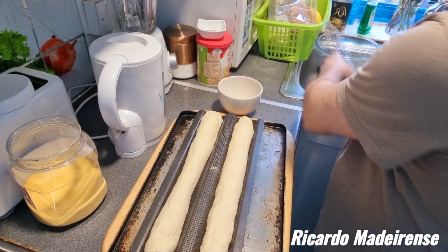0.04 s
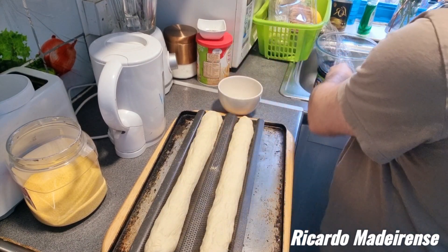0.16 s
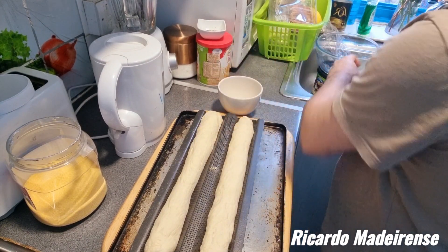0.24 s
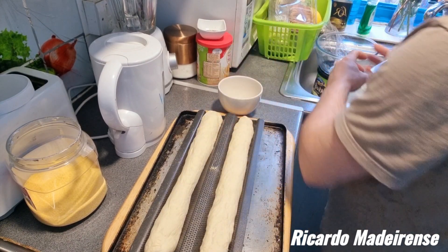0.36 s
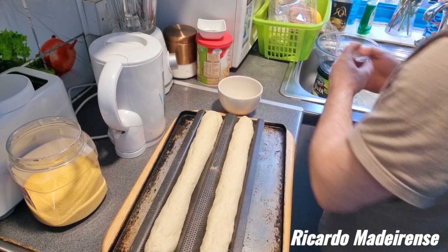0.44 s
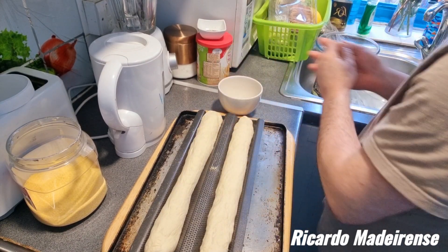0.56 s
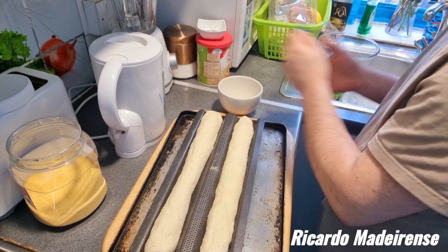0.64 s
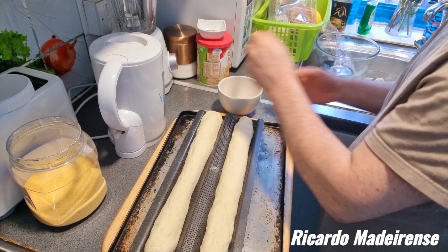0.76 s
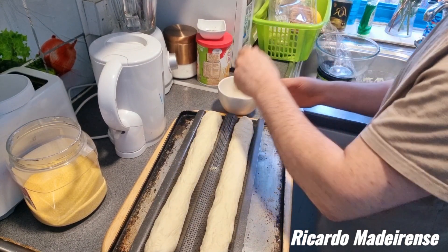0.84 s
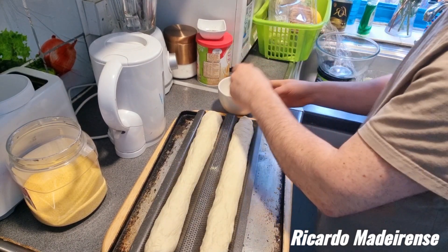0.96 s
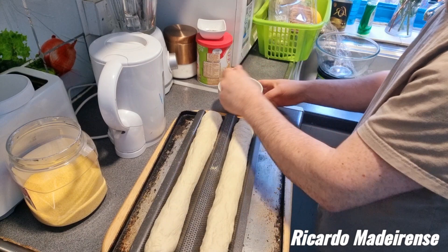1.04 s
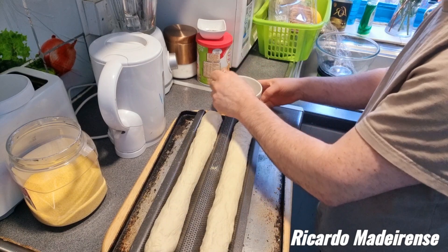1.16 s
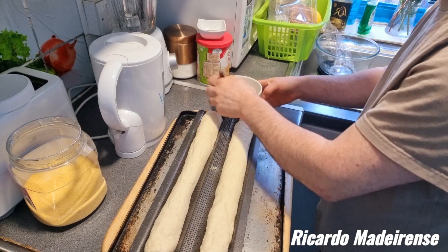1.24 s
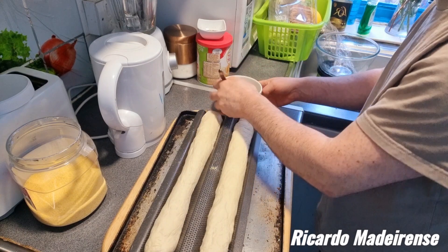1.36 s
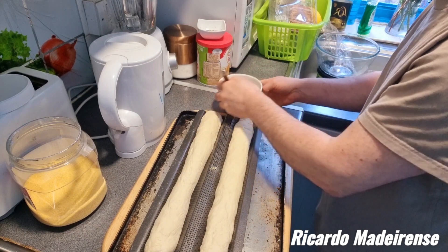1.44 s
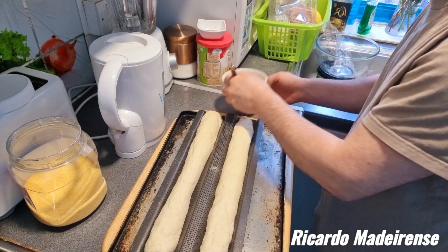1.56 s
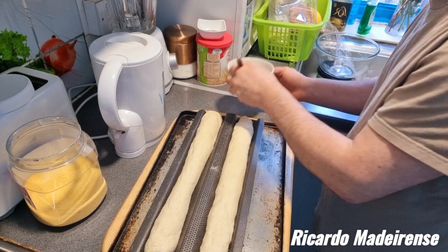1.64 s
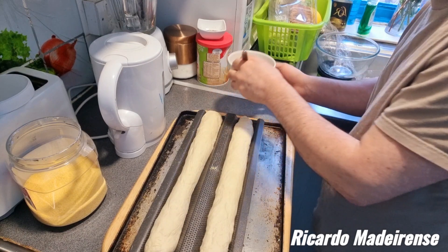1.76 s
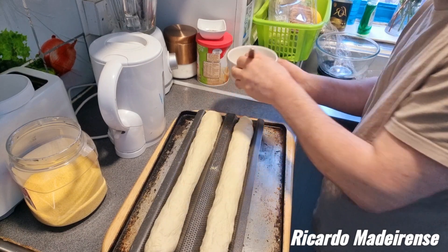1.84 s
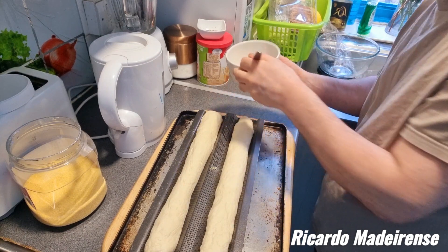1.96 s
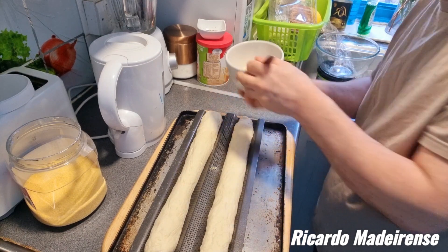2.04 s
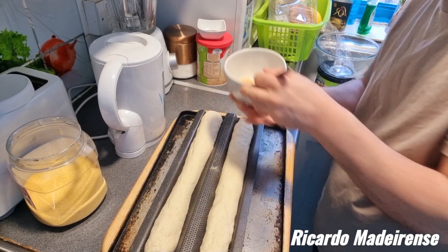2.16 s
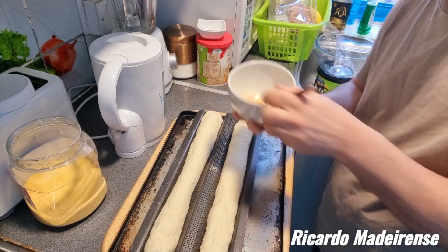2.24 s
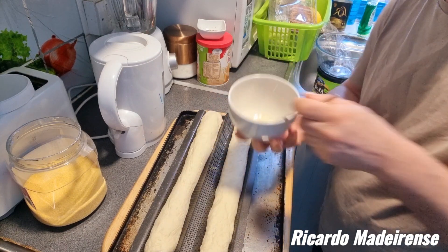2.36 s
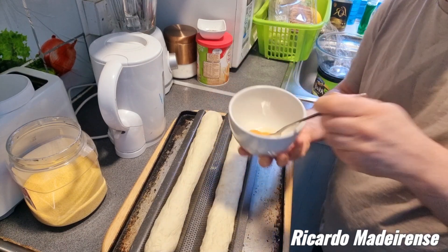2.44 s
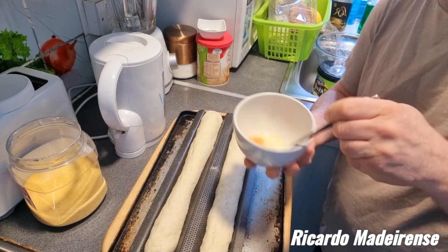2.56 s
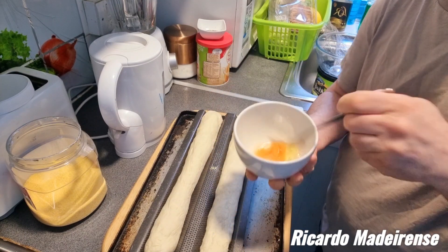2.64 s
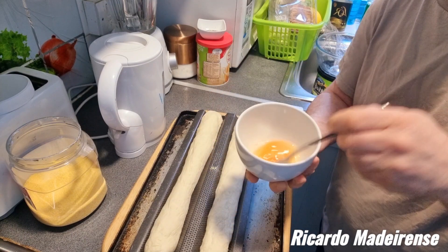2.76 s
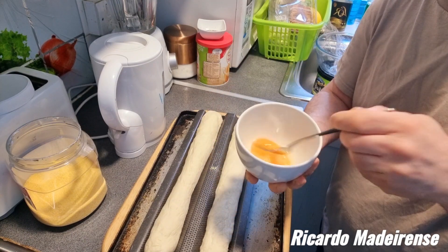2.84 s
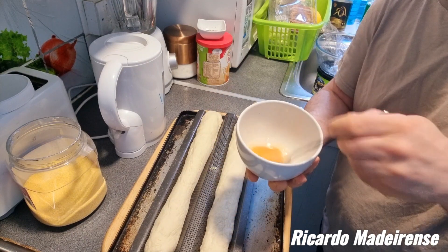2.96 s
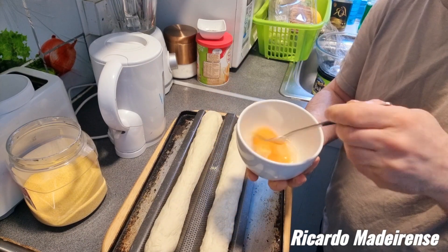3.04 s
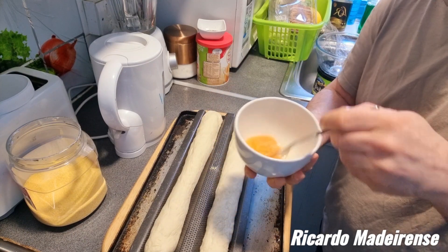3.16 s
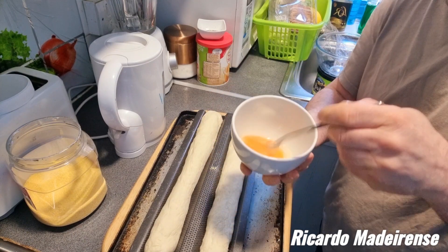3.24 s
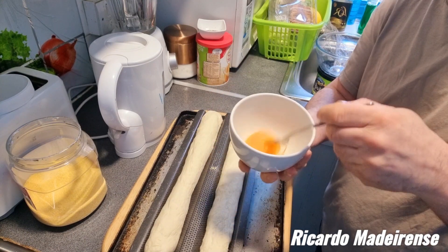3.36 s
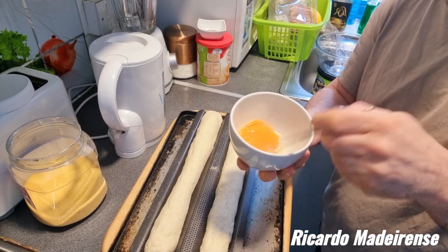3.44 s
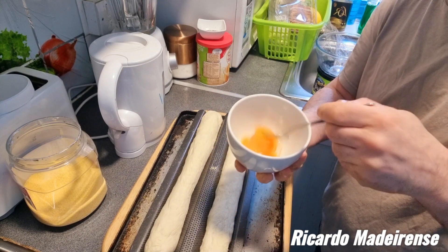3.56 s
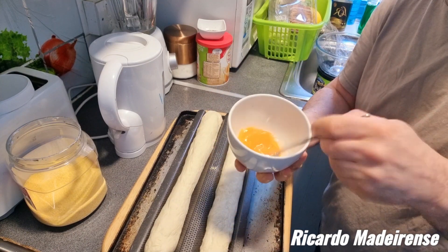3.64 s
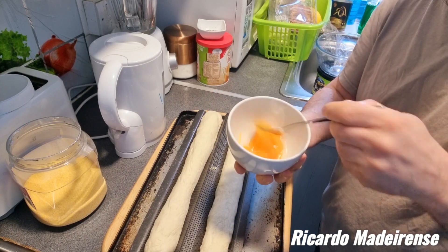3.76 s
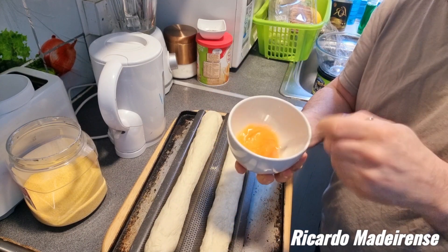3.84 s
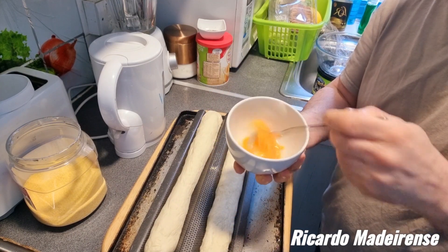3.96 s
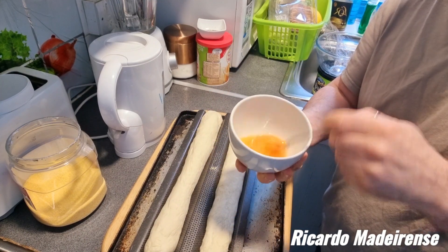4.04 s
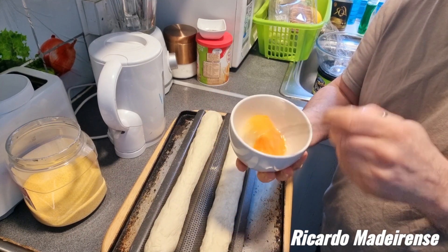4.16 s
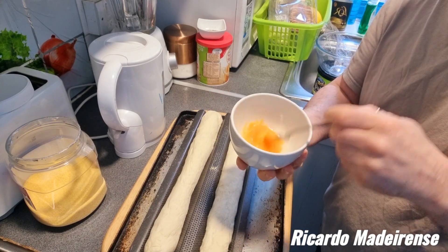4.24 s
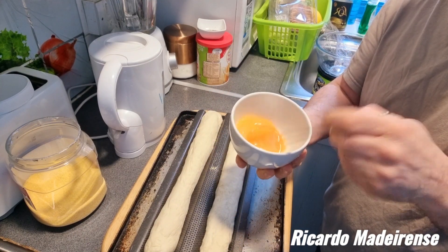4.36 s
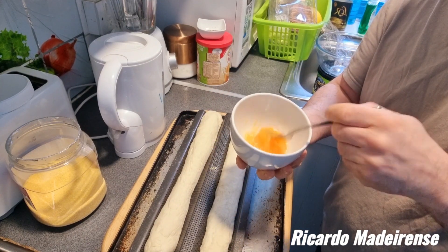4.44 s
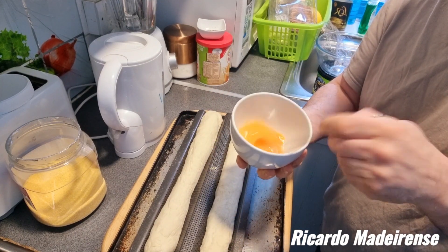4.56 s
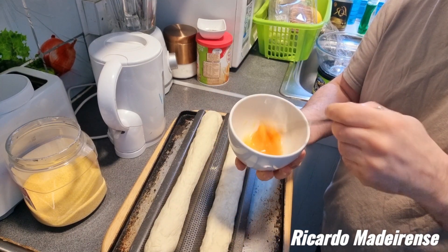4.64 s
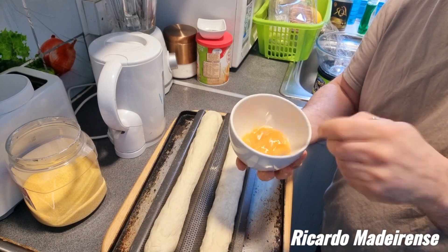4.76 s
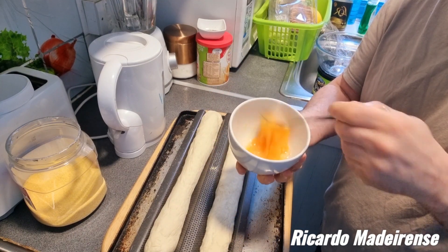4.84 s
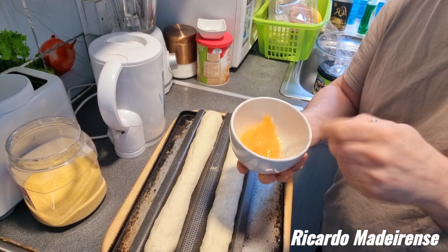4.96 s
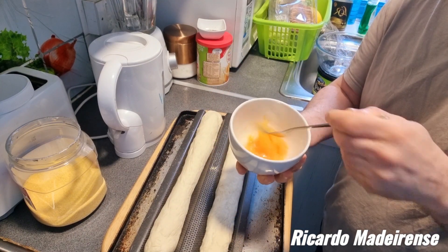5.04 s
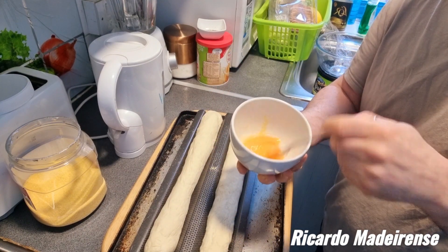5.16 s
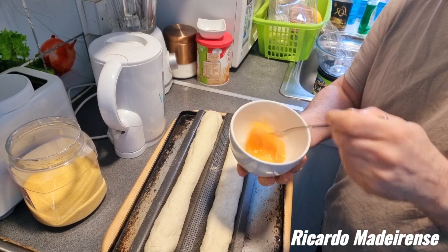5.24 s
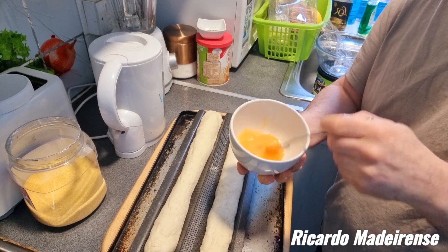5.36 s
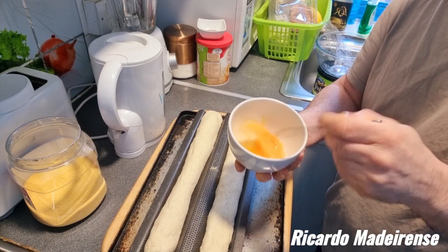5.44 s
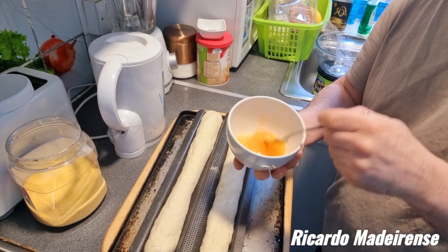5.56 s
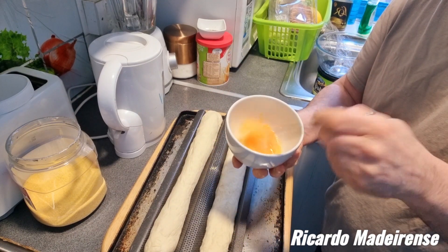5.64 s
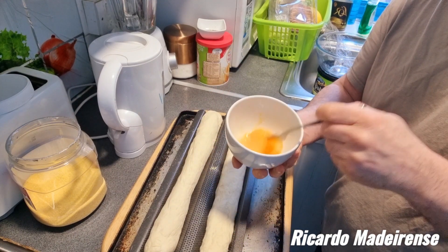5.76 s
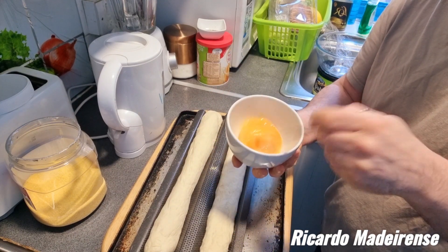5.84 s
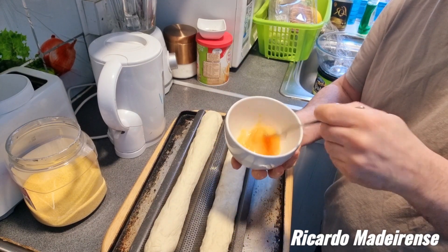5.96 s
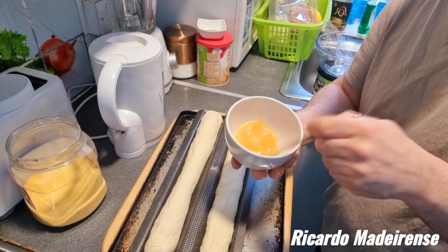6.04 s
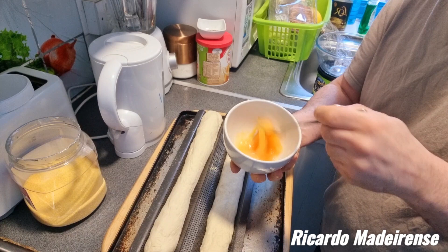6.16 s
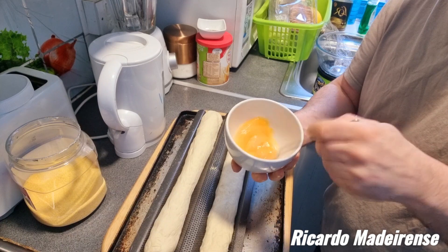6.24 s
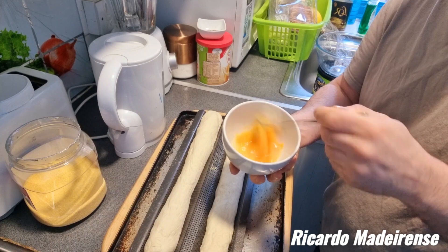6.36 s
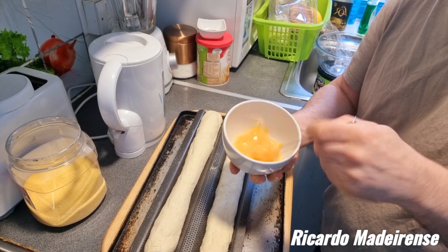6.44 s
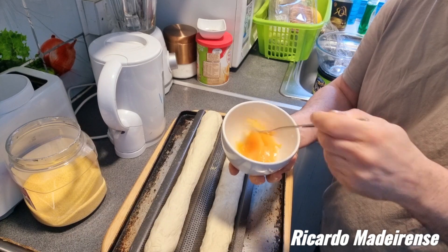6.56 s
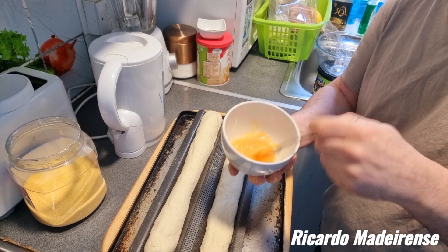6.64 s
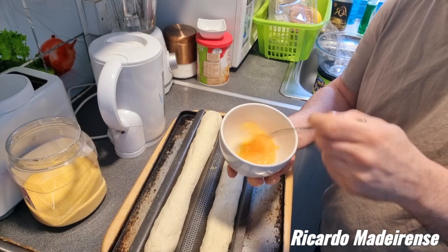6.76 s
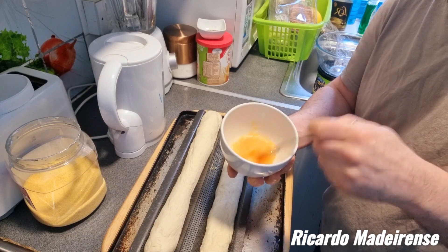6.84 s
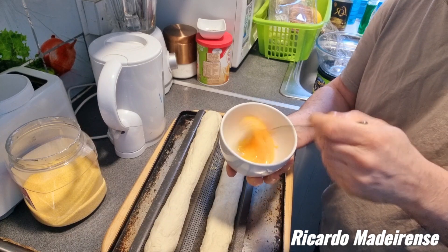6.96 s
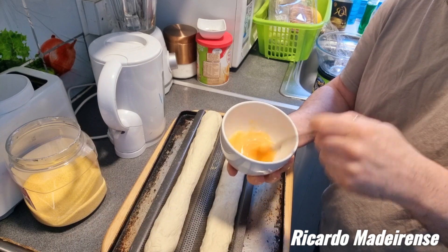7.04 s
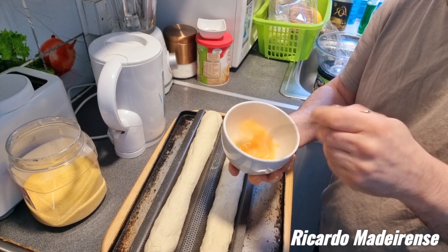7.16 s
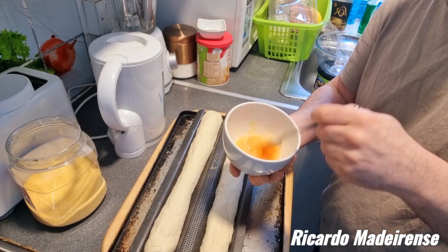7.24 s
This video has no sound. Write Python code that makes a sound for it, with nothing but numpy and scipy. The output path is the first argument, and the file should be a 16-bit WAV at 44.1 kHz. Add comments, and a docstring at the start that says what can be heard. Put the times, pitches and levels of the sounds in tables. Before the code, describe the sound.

A sharp rattling knock in a small kitchen, a few light ticks, then a fork briskly beating an egg in a ceramic bowl with wet plops.

```python
"""Beating an egg in a small bowl

A fork beats an egg in a hand-held ceramic bowl in a small kitchen, over a low hum (steady sines), room air and
rustle (coloured noise). First something lands in the sink: a noisy rattle, a low thud and faint ringing modes.
After two dull ticks, strokes clatter on the glaze (noise bursts and short modes) and sometimes ring the rim
(pairs of long tones). The egg plops as air folds in (dying sines that rise). Dense noise echoes make the room.
"""
import sys
import numpy as np
from scipy import signal
from scipy.fft import rfft, irfft
from scipy.io import wavfile
from scipy.ndimage import uniform_filter1d

SR = 44100
rng = np.random.default_rng(int(sys.argv[2]) if len(sys.argv) > 2 else 0)


def output_pcm(signal):
    """Save a mono or channel-first signal as 16-bit PCM at the path in sys.argv[1].

    Samples are clipped to [-1, 1] before scaling.
    """
    pcm = np.clip(np.atleast_2d(signal).T, -1, 1) * 32767
    wavfile.write(sys.argv[1], SR, np.round(pcm).astype(np.int16))


N = 321726  # samples in the scene

# In every table, t60_s is the time a sound takes to die away by 60 dB.
# Pitches of the four rim tones, two modes each: first_hz, second_hz [Hz]
# The three lowest are close pairs that beat; the two modes of the highest go together.
RIM_PITCHES = [(1593, 1612), (4043, 4075), (7221, 7250), (11040, 15470)]
# How the two modes of each rim tone ring, a pair of rows per tone: relative level_db [dB], t60_s [s]
RIM_MODES = [
    [(0, 0.19), (0, 0.19)],
    [(-3.5, 0.25), (4, 0.035)],
    [(6.5, 0.07), (-22, 0.12)],
    [(3.5, 0.082), (14, .04)],
]
# Strength of hands, sleeves, the sliding bowl and the fork dragging through egg: time_s [s], level_db [dB]
RUSTLE_SWELL = [(0, -67.5), (.12, -73.5), (.8, -85), (.97, -66), (1.2, -85.5), (1.42, -75.5), (1.7, -100),
                (1.95, -73.5), (2.15, -68), (2.399, -62), (2.6, -75.5), (3.1, -71.5), (3.6, -72.5),
                (5.5, -69.5), (7.3, -70)]
# How alike left and right are: pitch_hz [Hz], likeness [0 unrelated, 1 the same]
STEREO_LIKENESS = [(60, 0.73), (250, 1), (500, 0.22), (1000, 0.75), (3000, 0.67), (15000, 0.7)]


def from_db(db):
    """Turns decibels into a gain."""
    return 10 ** (np.asarray(db) / 20)


def rms_one(x):
    """Scales a sound to an rms (average strength) of 1."""
    return x / np.sqrt(np.mean(x ** 2) + 1e-20)


def at_hz(points, hz):
    """Reads a table between its points, along a logarithmic pitch axis."""
    points = np.array(points)
    return np.interp(np.log(hz), np.log(points[:, 0]), points[:, 1])


def add(out, start_s, sound):
    """Mixes a sound in at its start time, cut off at the end of the scene."""
    at = round(start_s * SR)
    out[:, at:at + sound.shape[-1]] += sound[..., :N - at]


def panned(pan_db):
    """Gives left and right gains that differ by pan_db; positive leans left."""
    return from_db(np.outer([.5, -.5], pan_db))


def at_ports(vibration, hz, pan_db):
    """A complex vibration reaches the left microphone port with a phase lead that depends on pitch."""
    # phase lead of left over right: pitch_hz [Hz], lead [radians]
    left_leads = [(20, -1.5), (600, -0.23), (1400, 1), (2070, 1.81), (3270, 1.16), (4050, -2), (5170, 4.5),
                  (6290, 8.5), (7240, 6), (16500, 9)]
    lead = np.exp(.5j * at_hz(left_leads, hz) * np.array([[1], [-1]]))
    return np.imag(panned(pan_db) * lead * vibration)


def flicker(depth_db, rate):
    """A gain that wanders at random, aiming at `rate` new values a second."""
    knots = from_db(depth_db * rng.standard_normal(N // 1000))
    return np.interp(np.arange(N) * (rate / SR), np.arange(len(knots)), knots)


def bands(white, octaves=.6):
    """Yields (centre Hz, band of noise); neighbouring bands come from unrelated noises."""
    edges = 25 * 2 ** np.arange(0, 9.6, octaves)
    for k, (low, high) in enumerate(zip(edges, edges[1:])):
        band_filter = signal.butter(2, [low, high], "band", fs=SR, output="sos")
        yield np.sqrt(low * high), signal.sosfilt(band_filter, white[k % 2])


def stereo(mid, side, hz):
    """Shared noise plus noise of opposite sign left and right gives the likeness wanted at this pitch."""
    alike = np.clip(at_hz(STEREO_LIKENESS, hz), 0, 1)
    return np.sqrt(1 + alike) * mid + np.sqrt(1 - alike) * side * [[1], [-1]]


def shaped(x, spectrum):
    """Colours a sound with a minimum-phase filter, which never sounds before its input."""
    hz = np.maximum(np.fft.rfftfreq(1024, 1 / SR), 1)
    # folding the cepstrum (transform of the log spectrum) onto positive times gives minimum phase
    cepstrum = irfft(at_hz(spectrum, hz) * np.log(10) / 20)
    cepstrum[1:512] *= 2
    cepstrum[513:] = 0
    response = irfft(np.exp(rfft(cepstrum)))
    return signal.fftconvolve(x, response)[None]


def ring(force, hz, t60_s):
    """A force sets off one dying mode, as a complex vibration; a unit tap gives unit height."""
    pole = from_db(-60 / (t60_s * SR)) * np.exp(2j * np.pi * hz / SR)
    return signal.lfilter([1], [1, -pole], force + 1e-18)


def chatter(spread_s, length_s, skid=0.056):
    """Uneven contacts that gather quickly and thin out, then a weaker, longer skid; unit energy."""
    t = np.arange(round(length_s * SR)) / SR / max(spread_s, 3e-4)  # time in spreads
    sizes = rng.standard_normal(len(t)) * rng.exponential(1, len(t)) ** 1.5
    burst = sizes * np.sqrt(t) * (np.exp(-t) + skid * np.exp(-t / 3.26))
    return burst / np.linalg.norm(burst)


def hum():
    """Mains-driven sine lines that waver a little together."""
    # steady lines: pitch_hz [Hz], level_db before the wavering [dB rms]
    lines = [(42, -70.5), (100, -51), (200, -71), (300, -76)]
    t = np.arange(N) / SR
    tones = sum(np.sqrt(2) * from_db(db) * np.sin(2 * np.pi * hz * t) for hz, db in lines)
    return flicker(0.78, 6.4) * tones


def background(air_level_db=-62.5):
    """Room air and rustle: stereo noise that flickers band by band."""
    # colour of quiet room air: pitch_hz [Hz], relative level_db [dB per Hz]
    air_colour = [(20, -24), (40, -13), (70, -4.5), (130, -6), (300, -15.5), (700, -20), (1500, -26.5),
                  (3000, -33.5), (5000, -38), (8000, -32), (10000, -43), (16000, -49.5)]
    # colour of the rustle: pitch_hz [Hz], relative level_db [dB per Hz]
    cloth_colour = [(290, -41.5), (500, -14.5), (1250, -8), (4100, 4.5), (6590, -25.5), (7480, -19.5),
                    (9340, -31), (14000, -25)]
    swell = from_db(np.interp(np.arange(N) / SR, *np.transpose(RUSTLE_SWELL)))
    air, cloth = 0, 0
    for hz, (mid, side) in bands(rng.standard_normal((2, 2, N))):
        band = flicker(3.6, 8.7) * stereo(mid, side, hz)
        air = air + from_db(at_hz(air_colour, hz)) * band
        cloth = cloth + from_db(at_hz(cloth_colour, hz)) * band
    return from_db(air_level_db) * rms_one(air) + swell * flicker(2, 20) * rms_one(cloth)


def rub():
    """Fingers and fork sliding on the glaze keep the two lowest rim tones whispering."""
    # how strongly sliding drives rim tones 1 and 2: drive_db [dB]
    drives_db = [-26, -31.5]
    swell = from_db(np.interp(np.arange(N) / SR, *np.transpose(RUSTLE_SWELL)))
    force = swell * flicker(1.8, 14) * rng.standard_normal(N)
    whisper = 0
    for pitches, modes, drive_db in zip(RIM_PITCHES, RIM_MODES, drives_db):
        hz, (mode_db, t60_s) = pitches[0], modes[0]  # only the first mode of each pair
        whisper = whisper + at_ports(from_db(drive_db + mode_db) * ring(force, hz, t60_s), hz, 0)
    return whisper


def knocks(crack_db=29.5):
    """Knocks of sink, worktop and hands: a rattle over a low thud; the steel sink sings on faintly."""
    # knocks: start_s [s], rattle_db [dB drive], thud_db [dB drive], spread_s of the contacts [s]
    knock_times = [(0.185, -6.5, -26, 0.014), (0.851, -45, -39, 0.0068), (1.021, -49, -58, 0.016),
                   (1.101, -69, -61, 0.011), (1.27, -80, -57, 0.013), (5.998, -50, -47.5, 0.012),
                   (6.168, -47, -54, 0.0069), (7.138, -33, -60.5, 0.0048)]
    # colour of the rattle: pitch_hz [Hz], relative level_db [dB per Hz]
    rattle_colour = [(350, -33), (600, -5.5), (1020, -6), (1140, 4.5), (1340, -8), (1440, -6), (4010, -4),
                     (6700, -12), (8960, -26.5), (15200, -26), (16500, -40)]
    # modes of the low thud: pitch_hz [Hz], relative level_db [dB], t60_s [s]
    thud_modes = [(155.7, -7.5, 0.051), (307, -11.5, 0.034), (371, -0.5, 0.068), (414, 4, 0.057)]
    # modes of the singing sink: pitch_hz [Hz], relative level_db [dB], t60_s [s]
    sink_modes = [(2330, -58, .8), (2650, -62, 1.2), (3150, -57, 1.5), (3550, -64, 1.2), (5620, -50, .3)]
    out = np.zeros((2, N))
    for start_s, rattle_db, thud_db, spread_s in knock_times:
        force = chatter(spread_s, .66)
        add(out, start_s, from_db(rattle_db + crack_db) * shaped(force, rattle_colour))
        for modes, drive_db in (thud_modes, thud_db), (sink_modes, rattle_db):
            for hz, mode_db, t60_s in modes:
                vibration = from_db(drive_db + mode_db) * ring(force, hz, t60_s)
                add(out, start_s, at_ports(vibration, hz, 0))
    return out


def strokes(usual_spread_s=0.0026, bowl_pan_db=3):
    """Lists every stroke or tick in time order: start, clatter, lows, highs, four rim tones, spread and pan."""
    # strokes and ticks that hardly ring the rim, the first two dull and narrow in pitch:
    # start_s [s], clatter_db [dB drive], extra lows_db [dB], extra highs_db [dB]
    plain_strokes = [(0.4551, -43, -21, -12), (0.8484, -24, -18, -17), (1.087, -56, -13, -1),
                     (2.036, -46.5, -1.5, -24), (2.6802, -26.5, -8.5, -8.5), (2.863, -32.5, -6.5, 1.5),
                     (3.0023, -29, -7.5, -12), (3.0436, -28.5, -7, -6.5), (3.1976, -39, -5, -9),
                     (3.2159, -26.5, -9.5, -7.5), (3.3856, -28, -6.5, -3.5), (3.504, -54.5, 6, -12),
                     (3.5686, -25.5, -9.5, -6.5), (3.7491, -21, -9, -9), (3.782, -37, -5, -3),
                     (4.1191, -30, 1.5, 0.5), (4.1319, -31.5, -0.5, -9), (4.2988, -25, -10, -6),
                     (4.4845, -25.5, -7.5, -6.5), (4.8615, -18, -15, -15.5), (4.8889, -30, -2.5, 0.5),
                     (5.234, -25, -7, -1.5), (5.4223, -20.5, -5, -7.5), (5.7929, -20, 0, -13),
                     (5.8, -28, -3, -10), (6.165, -14.5, -11.5, -14), (6.3586, -16.5, -12.5, -14),
                     (6.5398, -18.5, -8, -9)]
    # strokes that catch the free rim: the same four columns, then tone1_db to tone4_db of the rim [dB]
    rim_strokes = [(1.4813, -24.5, -6.5, -11, -41, -30.5, -49, -43),
                   (1.5472, -48, -5, -17, -49.5, -44.5, -70, -70),
                   (1.761, -31.5, -8, -17.5, -67, -37, -56, -54), (2.145, -43, 0, -8, -74, -44.5, -50, -61),
                   (2.426, -10, -6.5, -9, -25.5, -22, -18, -22.5),
                   (3.9124, -15, -7, -3, -25, -13, -15, -32.5),
                   (3.9428, -15.5, -5, -17.5, -27.5, -30, -29, -47),
                   (4.6458, -9, -12.5, -9.5, -23, -14, -23.5, -30),
                   (5.0445, -13, -7, -4.5, -30, -27.5, -19.5, -32),
                   (5.6059, -11.5, -12, -8, -29, -22.5, -14.5, -51.5),
                   (5.9726, -15, -11, -9.5, -38, -25.5, -20.5, -55),
                   (6.7291, -15, -7.5, -6, -27.5, -18, -14, -39),
                   (6.9255, -12, -11.5, -6, -29, -18, -10, -45),
                   (7.116, -14.5, -9, -6.5, -30, -35, -12, -36)]
    # how faintly a plain stroke rings the rim: tone1_db to tone4_db relative to its clatter [dB]
    plain_to_rim_db = [-37, -44, -28.5, -22.5]
    plain = [(*row, *(row[1] + np.array(plain_to_rim_db))) for row in plain_strokes]
    rows = np.array(sorted(plain + rim_strokes))
    skid, side = rng.standard_normal((len(rows), 2)).T  # skid and side vary by chance
    return np.column_stack([rows, usual_spread_s * 1.4 ** skid, bowl_pan_db + 1.5 * side])


def clatter(hits, crack_db=26.0, tines_db=-4.0, low_hz=3800, high_hz=7500):
    """Contacts land and skid one after another: a crack, and short modes struck unevenly."""
    # short modes of tines and hand-damped bowl floor: pitch_hz [Hz], relative level_db [dB], t60_s [s]
    tine_modes = [(1865, -2.5, 0.041), (2498, -1.5, 0.057), (3412, -1.5, 0.038), (4475, -6.5, 0.0071),
                  (4890, -4.5, 0.03), (5399, -1, 0.008), (6440, 4.5, 0.014), (7470, -1.5, 0.019),
                  (8800, -6.5, 0.033), (12360, -2.5, 0.035)]
    # colour of the crack: pitch_hz [Hz], relative level_db [dB per Hz]
    crack_colour = [(400, -76), (900, -8), (1700, 0), (3400, 0), (6600, -1.5), (8000, -7.5), (13000, -10),
                    (15400, 3.5), (16000, -41), (16900, -35)]
    out = np.zeros((2, N))
    for start_s, level_db, low_db, high_db, *_, spread_s, pan_db in hits:
        # extra level below low_hz and above high_hz
        tilt = np.array([(.9 * low_hz, low_db), (low_hz, 0), (high_hz, 0), (0.99 * high_hz, high_db)])
        force = from_db(level_db) * chatter(spread_s, .08)
        colour = [(hz, db + at_hz(tilt, hz)) for hz, db in crack_colour]
        add(out, start_s, panned(pan_db) * from_db(crack_db) * shaped(force, colour))
        chances = rng.standard_normal((len(tine_modes), 2))
        for (hz, mode_db, t60_s), (uneven, off) in zip(tine_modes, chances):
            share_db = mode_db + tines_db + 2.5 * uneven + at_hz(tilt, hz)
            varied_hz = hz * (1 + .012 * off)  # each mode's pitch varies a little by chance
            add(out, start_s, at_ports(from_db(share_db) * ring(force, varied_hz, t60_s), hz, pan_db))
    return out


def rim(hits, push_s=.002, damp_s=.008):
    """Long bowl tones swell over a few milliseconds, ring in beating pairs, and are soon damped."""
    out, t = np.zeros((2, N)), np.arange(SR // 4) / SR
    times = np.append(hits[:, 0], np.inf)
    tones = []
    for pitches, modes in zip(RIM_PITCHES, RIM_MODES):
        tones.append([(hz, from_db(mode_db - 60 * t / t60_s) * np.exp(2j * np.pi * hz * t))
                      for hz, (mode_db, t60_s) in zip(pitches, modes)])
    for start_s, _, _, _, *tones_db, _, pan_db in hits:
        # damped at the first stroke over 0.16 s later, or after 0.2 s at most
        damped_after_s = min(times[times > start_s + .16][0] - start_s, .2)
        shape = (1 - np.exp(-t / push_s)) * np.exp(-np.maximum(t - damped_after_s, 0) / damp_s)
        for pair, tone_db in zip(tones, tones_db):
            for hz, mode in pair:
                # one blow starts both modes nearly in step
                start = from_db(tone_db) * np.exp(1j * rng.normal(0, .5))
                add(out, start_s, shape * at_ports(start * mode, hz, pan_db))
    return out


def egg(rise=2.6, swell_s=0.00068):
    """Each pocket of air is a dying sine that rises, in octaves per second, as it shrinks; froth adds small ones."""
    # air pockets closing in the egg: start_s [s], level_db [dB], starting pitch_hz [Hz], t60_s [s]
    plops = [(3.121, -39, 1670, 0.025), (3.238, -31, 2780, 0.012), (3.944, -24.5, 856, 0.077),
             (4.0619, -25.5, 2440, 0.017), (4.133, -24.5, 1020, 0.067), (4.151, -27.5, 1258, .051),
             (4.306, -28, 1090, 0.031), (4.586, -43, 1290, 0.025), (4.671, -34, 1120, .022),
             (4.714, -33.5, 974, .023), (4.8273, -22.5, 3030, 0.0096), (4.863, -21, 1850, .015),
             (4.892, -25, 1224, 0.014), (4.99, -22, 920, .012), (5.047, -16.5, 1280, 0.016),
             (5.077, -26, 858, 0.034), (5.164, -37.5, 963, 0.032), (5.228, -32, 973, .052),
             (5.732, -37, 900, 0.046), (5.8, -19.5, 712, 0.044), (5.829, -30, 720, 0.024),
             (5.982, -17, 1344, .012), (6.1636, -13, 1910, 0.028), (6.175, -13, 1006, 0.0095),
             (6.19, -32.5, 556, 0.051), (6.366, -18.5, 1087, 0.02), (6.5415, -22, 2410, 0.035),
             (6.553, -22, 1032, 0.043), (6.772, -31, 1245, 0.019), (7.061, -16, 1017, 0.013),
             (7.084, -37, 836, 0.06), (7.154, -35.5, 832, 0.11), (7.213, -27.5, 1242, 0.029)]
    froth_from_s, froth_per_s, softest_froth_db = 3.2, 41, -65.5
    froth_cycles = 19  # a small bubble dies away by 60 dB in this many cycles of its starting pitch
    out, t = np.zeros((2, N)), np.arange(SR // 10) / SR
    when, pitch, size = rng.random((3, 400))
    froth_s = froth_from_s + np.cumsum(-np.log(when) / froth_per_s)  # random gaps between bubbles
    froth_hz = 600 * 5.0 ** pitch
    froth_db = softest_froth_db - 6.5 * np.log(np.maximum(size, .1))
    froth = zip(froth_s, froth_db, froth_hz, froth_cycles / froth_hz)
    for start_s, level_db, hz, t60_s in plops + [row for row in froth if row[0] < N / SR]:
        bend = rise * rng.uniform(.2, 1.8)  # how fast each plop rises varies by chance
        turns = np.cumsum(hz * 2 ** (bend * t)) / SR
        height = from_db(level_db - 60 * t / t60_s) * (1 - np.exp(-t / swell_s))
        add(out, start_s, at_ports(height * np.exp(2j * np.pi * turns), hz, -0.74))
    return out


def kitchen(x, first_s=0.0024):
    """Walls return dense echoes that die band by band, more alike at both sides where the likeness is high."""
    # how long echoes last: pitch_hz [Hz], t60_s [s]
    echo_times = [(300, 0.23), (1000, 0.11), (3000, 0.2), (8000, 0.16), (16000, 0.3)]
    t, tail = np.arange(SR // 2) / SR, 0
    for hz, (mid, side) in bands(rng.standard_normal((2, 2, len(t)))):
        fade = from_db(-60 * t / at_hz(echo_times, hz))
        tail = tail + stereo(mid, side, hz) * fade * (t > first_s)
    tail = tail / np.linalg.norm(tail, axis=1, keepdims=True)
    return signal.fftconvolve(x.mean(axis=0, keepdims=True), tail, axes=1)[:, :N]


def scene(room_db=-2, rim_room_db=-4.5):
    """Adds up near sounds, their echoes, and the background."""
    hits = strokes()
    tones = rim(hits) + rub()
    near = clatter(hits) + egg() + knocks()
    # the long tones reach the walls more weakly than the clatter
    echoes = from_db(room_db) * kitchen(near + from_db(rim_room_db) * tones)
    return tones + near + echoes + background() + hum()


def record(dry, smooth_s=0.047, cutoff_hz=16700):
    """Gain control turns down after loud hits and creeps back; the top is cut."""
    loud_db, squeeze = -20, 0.053  # threshold, and dB of cut per dB above it
    release_db_per_s = 54.5  # how fast the held loudness falls
    power = uniform_filter1d(np.mean(dry ** 2, axis=0), size=400, origin=199)  # over the last 400 samples
    level_db = 10 * np.log10(power + 1e-12)
    ramp = release_db_per_s * np.arange(N) / SR
    held_db = np.maximum.accumulate(level_db + ramp) - ramp  # jumps up at once, falls steadily
    keep = np.exp(-1 / (smooth_s * SR))
    cut_db = signal.lfilter([1 - keep], [1, -keep], squeeze * np.maximum(held_db - loud_db, 0))
    low_pass = signal.ellip(10, .3, 60, cutoff_hz, fs=SR, output="sos")
    return signal.sosfilt(low_pass, dry * from_db(-cut_db))


dry = scene()
out = record(dry)
output_pcm(out)
```